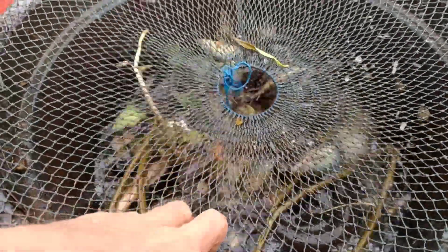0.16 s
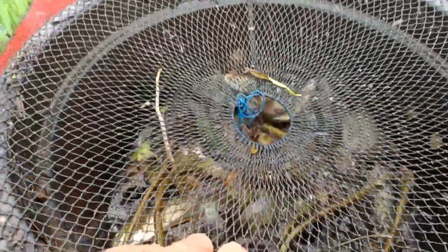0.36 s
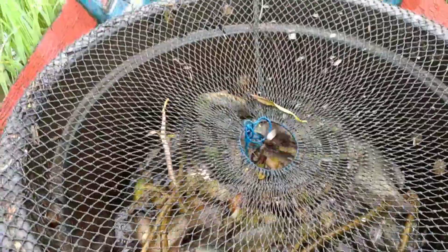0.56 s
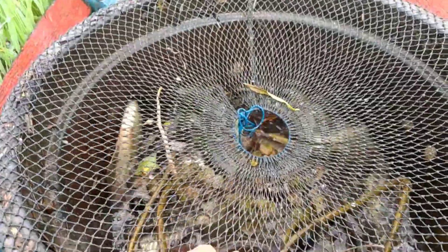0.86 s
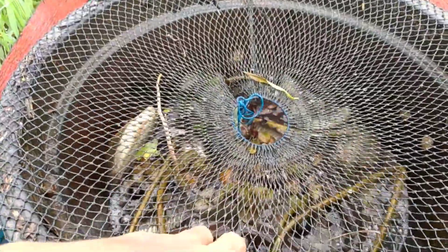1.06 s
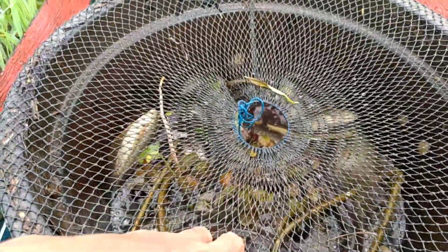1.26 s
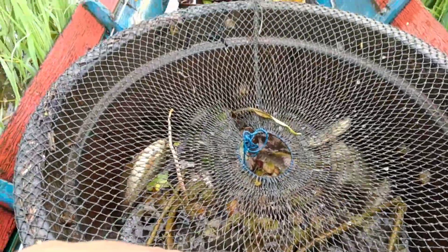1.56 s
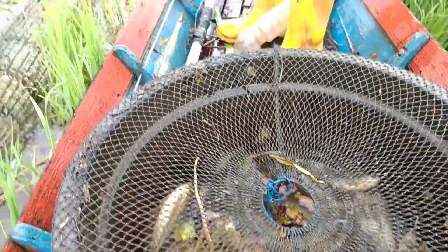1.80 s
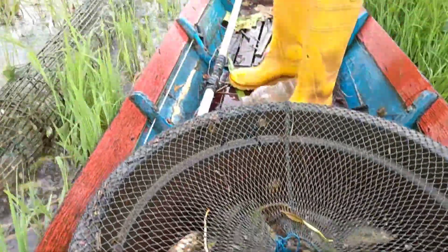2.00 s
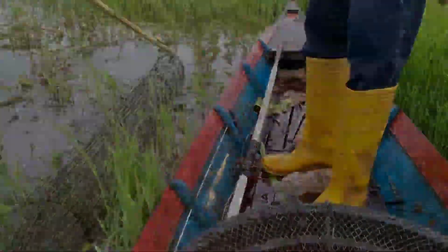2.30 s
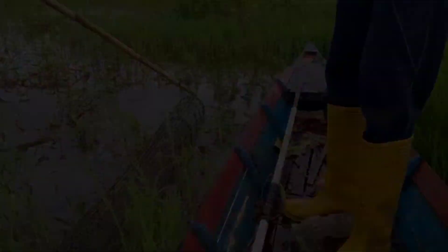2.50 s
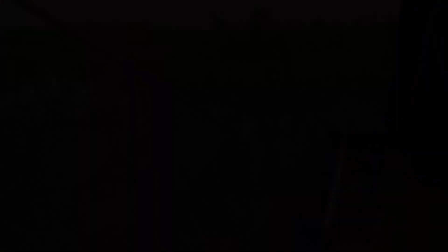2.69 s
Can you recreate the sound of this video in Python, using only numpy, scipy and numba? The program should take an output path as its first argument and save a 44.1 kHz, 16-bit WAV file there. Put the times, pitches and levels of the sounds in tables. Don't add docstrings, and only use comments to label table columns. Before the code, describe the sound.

Fish thrash in shallow water in a netted tub, heard close on a phone outdoors. Dense splashing and crackling spray open the first 0.1 s, with sharp slaps near 0.3, 0.45 and 0.5 s. Lighter plops and drips follow until a gulping, splashy burst at 1.6-1.7 s. Soft hollow knocks continue, more slaps come around 2.2 s, then from 2.4 s only faint drips and low wind remain.

```python
import sys
import numpy as np
from scipy import signal
from scipy.fft import rfft, irfft
from scipy.io import wavfile
from scipy.ndimage import uniform_filter1d
from numba import njit

SR = 44100
rng = np.random.default_rng(int(sys.argv[2]) if len(sys.argv) > 2 else 0)


def ratio_of_db(decibels):
    return 10 ** (np.asarray(decibels, float) / 20)


def generate_wav(sig):
    pcm = np.round(np.clip(np.atleast_2d(sig).T, -1, 1) * 32767).astype(np.int16)
    wavfile.write(sys.argv[1], SR, pcm)


N = 125685
TOP_HZ = 8245
TUB_HZ = 280


def colour(hz, table):
    table_hz, table_db = np.array(table).T
    return np.interp(np.log(np.maximum(hz, 1)), np.log(table_hz), table_db)


def noise(table, scatter_db=0):
    x = rng.standard_normal(N) * ratio_of_db(scatter_db * rng.exponential(size=N).clip(0, 7))
    x = irfft(rfft(x) * ratio_of_db(colour(np.fft.rfftfreq(N, 1 / SR), table)), N)
    return x / np.std(x)


def walk(rate):
    hold = int(SR / rate)
    steps = np.repeat(rng.standard_normal(N // hold + 1), hold)
    return 1.1 * uniform_filter1d(uniform_filter1d(steps, hold), hold)[:N]


def patches(x, depth_db, rate):
    edges = 300 * 2 ** np.arange(0, 5.5, 0.5)
    total = np.zeros(N)
    for band in zip(edges, edges[1:]):
        sos = signal.butter(2, band, "bandpass", fs=SR, output="sos")
        total += ratio_of_db(depth_db * walk(rate)) * signal.sosfilt(sos, x)
    return total


@njit
def rings(out, start, hz, t60, size, rise, rise_s):
    y = np.zeros(out)
    for k in range(len(start)):
        i0, phase = int(start[k] * SR), 0.
        for j in range(max(min(int(t60[k] * SR), out - i0), 0)):
            t = j / SR
            phase += 2 * np.pi * hz[k] * (1 + rise[k] * (1 - np.exp(-t / rise_s[k]))) / SR
            decay = np.exp(-np.log(1000) * t / t60[k])
            attack = min(j * hz[k] / SR, 1.)
            y[i0 + j] += size[k] * np.sin(phase) * decay * attack
    return y


def slaps(table, cycles, spread, crowd_db, rise, count):
    s, db, hz = np.array(table).T[:, :, None] * np.ones(count)
    late, off, small = np.moveaxis(rng.random((len(table), count, 3)), 2, 0)
    main = np.arange(count) == 0
    hz = np.clip(hz * np.where(main, 1, np.exp(spread * (2 * off - 0.7) * small)), 300, TOP_HZ)
    s = s - np.where(main, 0, 0.0045 * np.log(1 - late))
    t60 = (cycles / hz * np.where(main, 1, 0.45)).ravel()
    db = db + np.where(main, 0, crowd_db - 12 * small - 500 * (s - s[:, :1]))
    return rings(N, s.ravel().clip(0), hz.ravel(), t60, ratio_of_db(db).ravel(), rise + 0 * t60, t60)


def tub_resonance(x, width_hz):
    return signal.lfilter(*signal.iirpeak(TUB_HZ, TUB_HZ / width_hz, fs=SR), x)


# f/Hz, level/dB
OPEN_AIR = [(20, 1), (270, -7), (600, -41.5), (1500, -18.5), (4000, -26.5), (5500, -37), (7200, -25.5),
            (8400, -33.5)]


def wind():
    fade_db = np.interp(np.arange(N) / SR, (2, 2.8), (0, -7.5))
    gusts = ratio_of_db(-55 + fade_db + 1.8 * walk(2.8))
    rumble = gusts * noise([(25, -0.5), (60, -6.5), (160, -12.5), (400, -42.5)])
    return rumble + ratio_of_db(-57 + 0.5 * fade_db + 0.5 * walk(15.0)) * noise(OPEN_AIR)


# t/s, level/dB
STIR = [(0, -18.5), (0.202, -33.5), (0.337, -44), (.38, -36.5), (.53, -35), (.7, -41), (0.778, -35.5),
        (.94, -48.5), (1.05, -43), (1.13, -51), (1.4, -39), (1.54, -49.5), (1.698, -32), (1.87, -36),
        (2.0, -34.5), (2.239, -35.5), (2.441, -56), (2.85, -55.5)]


def stirring():
    return np.interp(np.arange(N) / SR, *np.array(STIR).T)


# f/Hz, level/dB
WATER = [(300, -24), (600, -21.5), (820, -6.5), (1600, -5), (4300, -8.5), (4800, -15), (7400, -4),
         (8400, -18.5)]


def patter(stir_db):
    drops_per_s, drop_cycles, drop_scatter_db = 2600, 12, 2.4
    count = int(drops_per_s * N / SR / 3)
    s, pick, big = rng.random((count, 3, 1)).transpose(1, 0, 2)
    late, off, long = rng.random((count, 3, 3)).transpose(2, 0, 1)
    s = (s * N / SR + 0.005 * late).ravel()
    hz = ((500 + 7000 * pick ** 1.8) * np.exp(off - 0.5)).ravel()
    uneven_db = (-drop_scatter_db * np.log(1 - 0.96 * big) - 8 * late).ravel()
    db = colour(hz, WATER) + 5 * np.log10(hz / 1000) + uneven_db
    t60 = drop_cycles * (0.5 + 2 * long.ravel() ** 2) / hz
    drops = rings(N, s, hz, t60, ratio_of_db(db), 0.15 + 0 * s, t60)
    fizz = patches(noise(WATER, scatter_db=4), depth_db=2.6, rate=70)
    return ratio_of_db(stir_db + 4.1 * walk(90)) * (ratio_of_db(-4.5) * drops / np.std(drops) + ratio_of_db(-4) * fizz)


def hum(stir_db):
    x = tub_resonance(rng.standard_normal(N), width_hz=25)
    return ratio_of_db(stir_db - 16.5 + 3.3 * walk(25)) * x / np.std(x)


# t/s, peak level/dB, f/Hz
FLICKS = [(0.001, -9, 910), (0.023, -10, 1680), (0.048, -24, 3000), (0.058, -10.5, 1130),
          (0.122, -12, 3200), (0.185, -10, 3660), (0.249, -18.5, 2800), (0.518, -10, 1500),
          (0.551, -13, 4170), (0.629, -15, 1670), (1.045, -20.5, 2980), (1.261, -19.5, 3200),
          (1.273, -36, 1060), (1.353, -24.5, 1150), (1.42, -16, 1680), (1.6, -21.5, 1980),
          (1.987, -13.5, 2860), (2.011, -19, 1530), (2.039, -21.5, 835), (2.055, -19, 905),
          (2.206, -8, 2340), (2.255, -14.5, 1670), (2.4, -33.5, 1240), (2.697, -34, 2100),
          (2.791, -29, 1340)]


def flicks():
    return slaps(FLICKS, cycles=10.5, spread=0.99, crowd_db=3, rise=0.12, count=16)


# t/s, peak level/dB
KNOCKS = [(0.01, -26), (0.057, -24), (0.088, -29), (0.174, -30), (0.282, -21), (0.354, -35), (0.406, -45),
          (0.437, -20), (0.519, -26), (0.541, -28), (0.573, -28.5), (0.622, -37), (0.659, -30),
          (0.688, -40.5), (0.755, -31.5), (0.842, -34), (0.884, -36), (0.984, -33), (1.056, -40),
          (1.069, -37), (1.227, -32), (1.288, -47), (1.381, -38), (1.423, -37), (1.454, -23.5),
          (1.603, -15), (1.673, -23), (1.749, -25.5), (1.79, -32), (1.813, -33), (1.941, -38.5),
          (1.985, -30), (2.086, -37.5), (2.149, -45), (2.174, -32), (2.204, -31.5), (2.23, -32),
          (2.253, -28.5), (2.278, -26), (2.336, -40), (2.366, -30), (2.521, -45), (2.581, -37.5),
          (2.678, -27.5), (2.709, -42.5), (2.787, -36.5)]


def knocks():
    s, db = np.array(KNOCKS).T
    s = s - 0.002
    hz = TUB_HZ * (1 + 0.036 * rng.standard_normal(len(s)))
    boom = rings(N, s, hz, 0.054 + 0 * s, ratio_of_db(db), 0 * s, 1 + 0 * s)
    boom = ratio_of_db(2) * tub_resonance(boom, width_hz=122)
    late, pick = rng.random((len(s), 8, 2)).T
    hz = (150 * 4.5 ** pick).ravel()
    start = (s + 0.0292 * late ** 2).ravel()
    size = ratio_of_db(db - 7.5 - 7 * late).ravel()
    thuds = rings(N, start, hz, 9 / hz, size, 0.16 + 0 * hz, 9 / hz)
    return boom + thuds


# t/s, peak level/dB, length/s
SPRAY = [(0.0144, -15.5, 0.0073), (0.0378, -6.5, 0.011), (0.0853, -10, 0.0091), (0.165, -15.5, 0.017),
         (0.2828, -21, 0.0049), (0.406, -23, 0.0059), (0.4414, -17.5, 0.0047), (0.5038, -14, 0.019),
         (0.5362, -11, 0.0054), (0.594, -28, 0.013), (0.6254, -19, 0.011), (0.739, -25.5, 0.0057),
         (0.7746, -15.5, 0.0054), (0.84, -23.5, 0.0053), (0.8654, -25.5, 0.0039), (0.8859, -21, 0.0067),
         (0.9812, -20.5, 0.0043), (1.0186, -18, 0.0051), (1.044, -27, 0.0082), (1.065, -29.5, 0.003),
         (1.0849, -27.5, 0.005), (1.197, -28, 0.0056), (1.2161, -24, 0.0044), (1.3867, -18.5, 0.0057),
         (1.456, -24, .004), (1.541, -35, 0.0041), (1.583, -31, 0.0043), (1.6, -31, 0.0018),
         (1.6327, -11.5, 0.0054), (1.617, -28.5, 0.0059), (1.668, -25, 0.0044), (1.709, -13, 0.0081),
         (1.724, -23.5, 0.0028), (1.9265, -23, 0.02), (2.084, -33.5, .003), (2.198, -15, 0.0082),
         (2.2777, -20, 0.0035), (2.3652, -16, 0.005), (2.5344, -34.5, 0.013), (2.5787, -22.5, 0.0056),
         (2.616, -27, 0.0046), (2.692, -43.5, 0.01), (2.79, -41.5, 0.019), (2.8344, -29.5, 0.018)]
# t/s, peak level/dB, length/s
POUR = (1.66, -21.5, 0.047)


def spray():
    t, env = np.arange(N) / SR, np.zeros(N)
    for s, db, length in [*SPRAY, POUR]:
        u = np.clip(t - s + 0.0021, 0, None) / max(length, 0.001)
        env = env + ratio_of_db(db) * u * np.exp(1 - 1.153 * u ** 1.08)
    flutter = ratio_of_db(3.7 * walk(400) - 1.5)
    hiss = flutter * noise([(500, -9.5), (4200, -3), (5000, -11.5), (7200, -5)], scatter_db=2.0)
    return env * patches(hiss, depth_db=1.8, rate=110)


# t/s, peak level/dB, f/Hz
PLOPS = [(0.08, -15.5, 1170), (0.093, -11, 865), (0.283, -7, 1517), (0.437, -14, 950), (0.489, -12, 1580),
         (0.609, -28.5, 1380), (0.757, -23, 870), (0.784, -14, 1300), (0.984, -22.5, 1370),
         (1.151, -28.5, 1070), (1.289, -17, 1006), (1.38, -16, 1147), (1.455, -22.5, 940),
         (1.502, -23, 1180), (1.583, -23.5, 1350), (1.633, -10, 1450), (1.638, -9.5, 1406),
         (1.672, -12.5, 1340), (2.083, -25, 1320), (2.179, -20, 1030), (2.242, -12.5, 1620),
         (2.337, -23, 986), (2.366, -20, 1745), (2.828, -22.5, 1050)]
# t/s, peak level/dB, f/Hz
SLOSH = (.29, -19.5, 515)


def plops():
    return slaps([*PLOPS, SLOSH], cycles=15.2, spread=1.65, crowd_db=2.0, rise=0.083, count=12)


# t/s, peak level/dB, f/Hz
TICKS = [(0.0924, -5.5, 4050), (0.2838, -8.5, 2490), (0.408, -21, 3070), (0.4417, -17.5, 4160),
         (0.4878, -10.5, 3480), (0.5375, -9.5, 3910), (0.7741, -18, 2250), (0.8415, -24, 2840),
         (0.8879, -21, 2930), (1.0018, -21.5, 2660), (1.0193, -18, 2940), (1.1982, -30, 3050),
         (1.2135, -19.5, 3310), (1.331, -16.5, 3230), (1.4069, -13, 3740), (1.4568, -20.5, 3900),
         (1.637, -13.5, 2080), (1.7175, -13, 4200), (2.1724, -17, 2560), (2.2385, -13, 2420),
         (2.2757, -15.5, 3110), (2.364, -24.5, 2000), (2.5117, -26, 2110), (2.5337, -27, 2080),
         (2.575, -27.5, 3130), (2.6158, -24.5, 2170)]


def ticks():
    return slaps(TICKS, cycles=25.2, spread=0.92, crowd_db=-0.5, rise=0.077, count=14)


# t/s, peak level/dB
THUMPS = [
    (0.283, -37),
    (0.438, -28),
    (.756, -35),
    (1.455, -29),
    (1.6, -33),
    (1.716, -39),
    (1.985, -22.5),
    (2.257, -27),
    (2.367, -37),
    (2.52, -39),
]


def thumps():
    s, db = np.array(THUMPS).T.copy()
    t60 = 0.028 + 0 * s
    return rings(N, s, 179 + 0 * s, t60, ratio_of_db(db), 0.39 + 0 * s, t60)


# t/s, peak level/dB, f/Hz
BLIPS = [(0.303, -32, 480), (0.316, -35, 450), (0.389, -33, 3000), (0.39, -31, 520), (0.595, -24.5, 3930),
         (0.611, -23.5, 1520), (0.738, -36, 3140), (0.775, -22, 6400), (0.82, -37, 5260),
         (0.866, -27.5, 4990), (1.056, -36, 800), (1.132, -47, 850), (1.154, -33, 4100), (1.228, -32, 770),
         (1.247, -34, 3100), (1.257, -33, 763), (1.274, -32, 3500), (1.442, -34.5, 2790),
         (1.542, -34.5, 980), (1.556, -36, 3610), (1.618, -35, 3120), (1.713, -22, 1290),
         (1.803, -27.5, 554), (1.828, -29, 526), (1.81, -25.5, 1800), (1.906, -28, 1550),
         (2.016, -31, 4120), (2.112, -20.5, 2295), (2.115, -19.5, 2310), (2.123, -24, 2400),
         (2.155, -34.5, 3030), (2.188, -28, 3330), (2.228, -27.5, 2600), (2.478, -50, 1050),
         (2.548, -41, 1070), (2.581, -32.5, 1160), (2.608, -35, 2170), (2.713, -40, 900), (2.806, -36, 905)]


def blips():
    cycles = 0.023 * np.array(BLIPS)[:, 2:]
    return slaps(BLIPS, cycles=cycles, spread=0.34, crowd_db=-6, rise=0.049, count=3)


# t/s, peak level/dB, start f/Hz, ring t60/s
GULPS = [
    (1.62, -21, 207, 0.21),
    (1.684, -33, 270, 0.17),
]


def gulps():
    s, db, hz, t60 = np.array(GULPS).T.copy()
    return rings(N, s, hz, t60, ratio_of_db(db), 372.6 / hz - 1, 0.012 + 0 * s) * ratio_of_db(2.2 * walk(60))


def scene():
    stir_db = stirring()
    water = plops() + ticks() + flicks() + blips() + spray() + patter(stir_db)
    tub = knocks() + thumps() + hum(stir_db) + gulps()
    return (water + tub + wind())[None]


def roll_off(x):
    return signal.sosfilt(signal.butter(12, 8810, fs=SR, output="sos"), x)


def record(dry):
    sos = signal.cheby2(12, 75, 1.1097 * TOP_HZ, fs=SR, output="sos")
    mix = signal.sosfilt(sos, dry)
    return roll_off(mix)


dry = scene()
out = record(dry)
generate_wav(out)
```